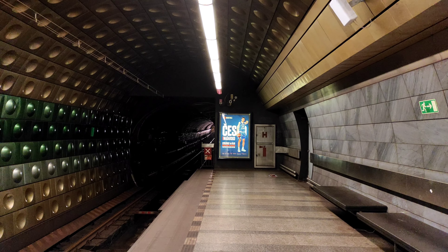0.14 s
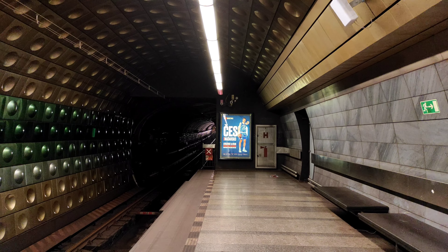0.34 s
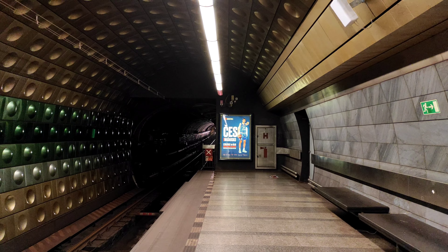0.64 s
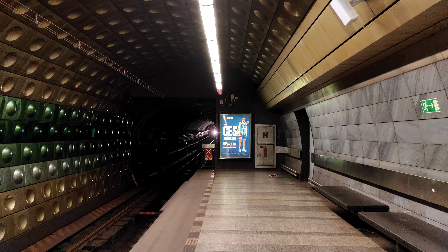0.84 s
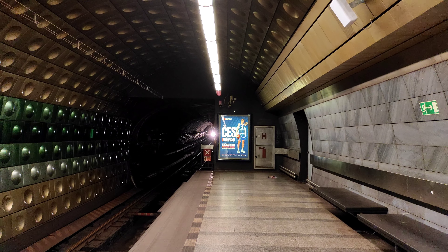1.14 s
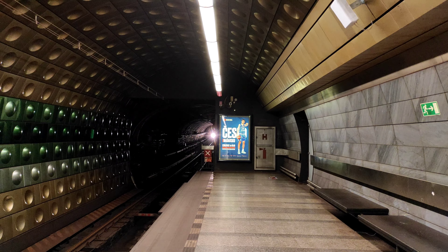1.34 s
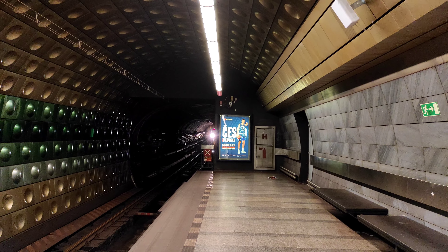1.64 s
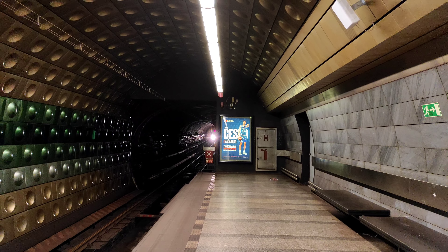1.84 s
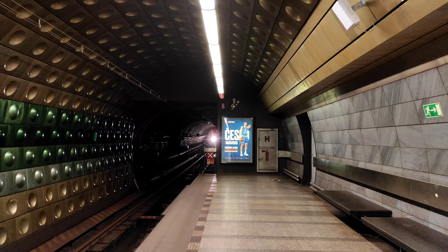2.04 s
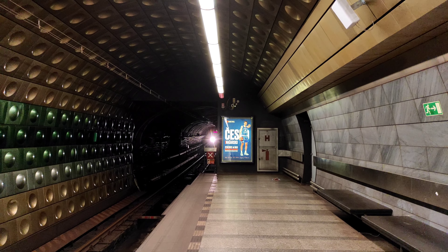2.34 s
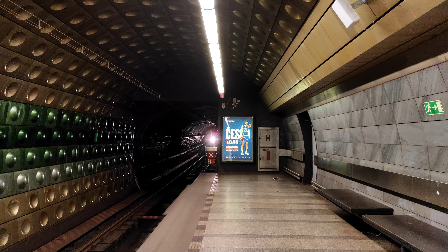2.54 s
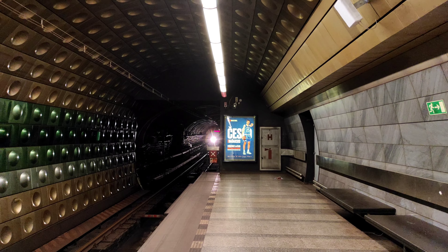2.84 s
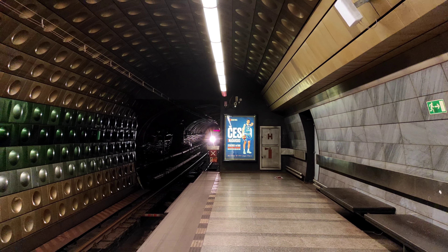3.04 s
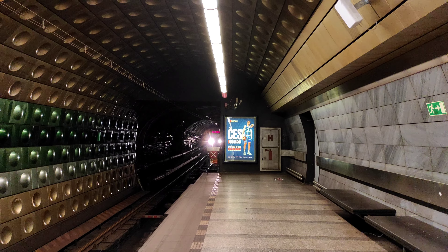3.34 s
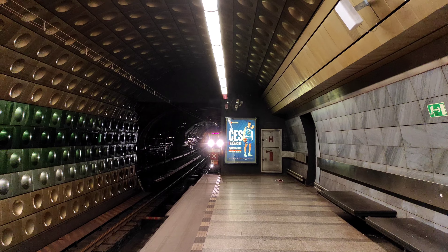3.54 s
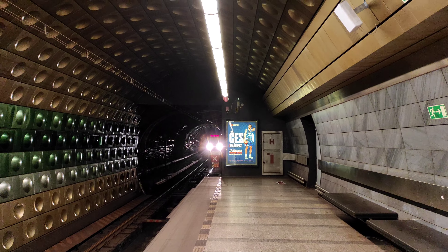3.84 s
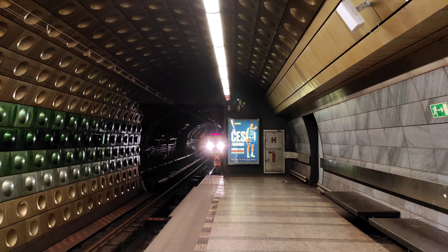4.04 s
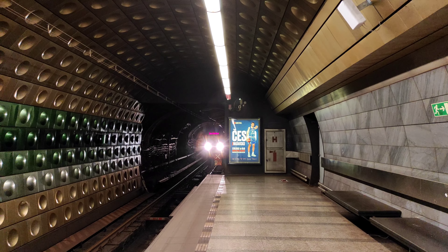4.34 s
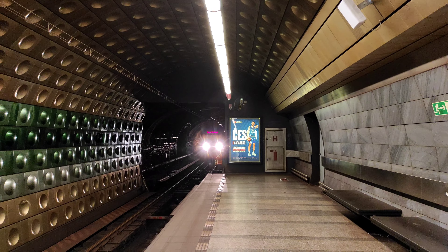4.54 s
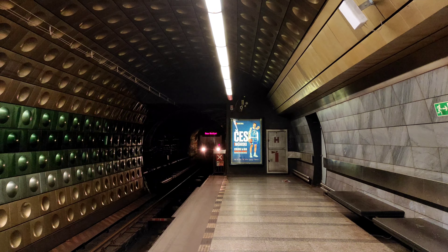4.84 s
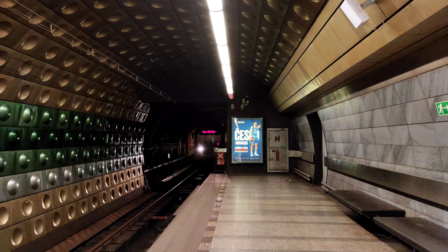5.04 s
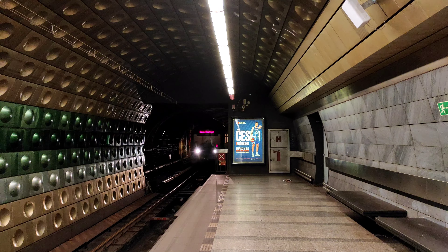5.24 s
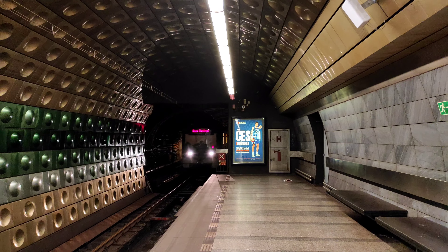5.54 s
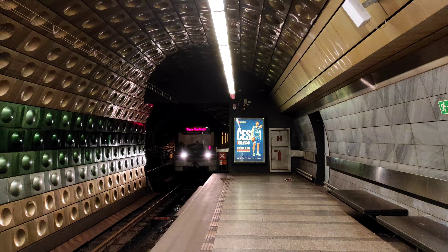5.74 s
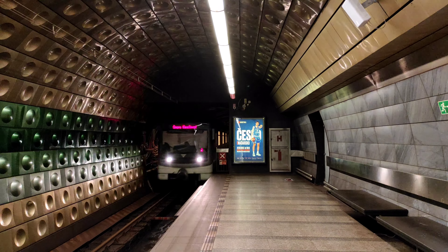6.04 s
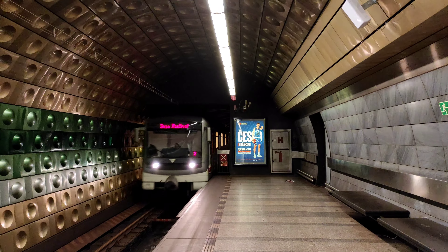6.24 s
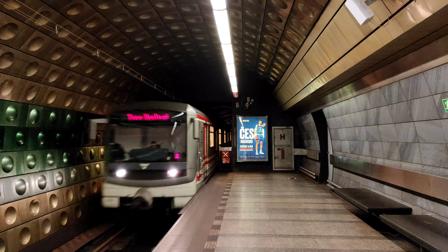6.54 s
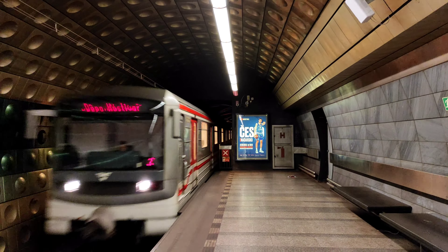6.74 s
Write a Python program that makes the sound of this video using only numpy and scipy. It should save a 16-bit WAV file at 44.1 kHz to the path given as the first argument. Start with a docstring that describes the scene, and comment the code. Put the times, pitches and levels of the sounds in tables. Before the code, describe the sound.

Stereo microphone on a vaulted metro platform, exposed to air pushed from the tunnel. First comes distant low rumble, mostly left, with fluttering wind thumps and one tiny dry tick at right. Rumble and falling electric whine grow, rails shimmer ahead of the train. In the last second or so, bright steel rolling, double bang of axles, short metallic screech, clear throbbing whine and gritty brake rub arrive close and loud.

```python
"""First a low tunnel roar and thumps of wind, then a metro train brakes into a vaulted station.
The roar is shaped noise that grows and brightens; motor and gear whines are wandering tones that sink.
Rolling, hiss and singing rails are bands of noise; a rail joint, scrapes and rubbing brakes join late.
Loudness follows the train's distance. The air it pushes ahead buffets two microphone ports:
noise in gusts, with short packets for single eddies."""
import sys
import numpy as np
from scipy import signal
from scipy.fft import rfft, irfft
from scipy.io import wavfile
from scipy.ndimage import uniform_filter1d, minimum_filter1d

SR = 44100
rng = np.random.default_rng(int(sys.argv[2]) if len(sys.argv) > 2 else 0)


def store_pcm(level_fs):
    """Save levels as 16-bit WAV."""
    pcm = np.round(np.clip(level_fs, -1, 1) * 32767).astype(np.int16)
    wavfile.write(sys.argv[1], SR, np.atleast_2d(pcm).T)


N = 303849

# time frames and frequency steps used to shape moving noise
SIZE, HOP = 1024, 256
HZ = np.fft.rfftfreq(SIZE, 1 / SR)
T = np.arange(N // HOP + 5)[:, None] * HOP / SR

# steady station air, colour: [f/Hz, relative level/dB per Hz]
AIR_COLOUR = [(3000, -36), (6400, -18), (7300, 12), (7850, 16.5), (8400, 8.5), (9000, -44), (10500, -49),
              (12600, -22.5), (15000, -35)]
AIR_DB = -47

# gusts pushed out of the tunnel: [t/s, length/s, left strength/dB, right strength/dB]
GUSTS = [(0.019, 0.12, -18, -25.5), (0.291, 0.12, -22, -15), (0.447, 0.033, -16.5, -24),
         (0.54, 0.058, -35, -29), (0.753, 0.028, -20, -38), (1.722, 0.028, -20, -14.5),
         (1.81, 0.085, -19.5, -26), (1.95, 0.18, -21, -20.5), (2.879, 0.14, -14.5, -16.5),
         (3.041, 0.057, -21, -21), (3.212, 0.052, -13.5, -21), (3.355, 0.081, -11, -13),
         (3.54, 0.2, -16, -18.5), (3.771, 0.025, -10.5, -14.5), (3.908, 0.058, -18.5, -17),
         (4.106, 0.025, -35, -20), (4.56, 0.13, -23.5, -22), (4.747, 0.049, -21, -11.5),
         (5.644, 0.019, -19, -15), (5.902, 0.053, -36, -15.5), (6.076, 0.035, -13, -16.5),
         (6.455, 0.073, -18, -28), (6.863, .05, -16, -17)]
GUST_RISE_S, GUST_SAG_DB_PER_S, GUST_FALL_DB_PER_S = 0.028, 15.5, 110
# draught between gusts (left, right): strength, change as the train nears; then the random swell
DRAUGHT_DB, DRAUGHT_GROWTH_DB, DRAUGHT_SWELL_DB = (-29, -36), (-4.5, 5.5), 4.5
# strongest single eddies on a port: [t/s, level/dB, corner f/Hz, port (0 left, 1 right)]
BUFFETS = [(.062, -8, 340, 0), (.111, -10.5, 270, 0), (.254, -15, 550, 0), (.275, -14, 600, 1),
           (.364, -15, 600, 1), (.408, -6.5, 493, 1), (1.721, -9.5, 300, 1), (1.751, -16, 900, 1),
           (1.766, -8.5, 624, 1), (1.794, -18, 650, 1), (1.855, -13, 240, 0), (1.946, -17, 240, 0),
           (2.008, -14, 260, 0), (2.198, -8.5, 270, 0), (2.885, -13, 420, 0), (3.342, -6, 400, 0),
           (3.367, -14, 1000, 1), (3.378, -9.5, 900, 1), (3.388, -12, 750, 1), (3.398, -6, 600, 1),
           (3.411, -24, 1200, 1), (3.421, -19, 950, 0), (3.449, -9, 850, 0), (3.536, -6, 790, 1),
           (3.541, -6.5, 650, 1), (3.545, -13, 850, 1), (3.601, -11, 320, 0), (3.758, -1, 450, 0),
           (3.809, -15, 380, 0), (3.938, -6.5, 340, 0), (4.132, -10, 484, 1), (4.777, -11, 450, 1),
           (4.799, -11, 650, 1), (4.803, -9, 650, 1), (4.941, -8, 330, 0), (5.66, -4, 544, 1)]
BUFFET_CYCLES = 2.56  # length in cycles of the corner: a small eddy is brighter and shorter
# ringing of the hollow behind a port: [f/Hz, width/Hz, gain/dB]
PORT_RING = (1060, 450, 2.8)

# one dry tick by the right port: [t/s, level/dB]
TICK = (.4065, -5.5)
# ringing of the tapped casing: [f/Hz, relative level/dB, time to fall 60 dB/s]
TICK_MODES = [(1420, 3, 0.0058), (2450, -6, 0.0068), (3540, -11, 0.006), (5570, -19, .006)]

# speed of the braking train, as the pitch of its motors: [t/s, whine f/Hz]
WHINE = [(0, 602), (1, 587), (2, 570), (3, 545), (4.1, 520), (5, 500), (5.75, 476), (6.3, 451), (6.89, 434)]
WHINE_HZ_PER_M_S = 40
DEEP_M = 65.5  # from this far off the train has only the dull colour of the tunnel
MOUTH_M, MOUTH_FADE_M = 12, 5.8  # tunnel mouth, and depth behind it over which top treble is lost
# growth of each sound as the train comes:
# [base level at the platform/dB, distance within which growth levels off/m, tunnel loss/dB per m]
ROAR_REACH = (-17, 106, 0.068)
ROLL_REACH = (-20.5, 11, 0.087)
HISS_REACH = (-27.5, 10.4, 0.14)
MOTOR_REACH = (-19.8, 12.6, .03)

# tunnel roar with the train far and near, colour: [f/Hz, relative level/dB per Hz]
ROAR_FAR = [(20, -14.5), (120, -13.5), (170, -11.5), (205, 1.5), (280, 1), (430, -10.5), (620, -10),
            (800, -13), (1050, -15), (1500, -28.5), (2500, -39.5), (6000, -68), (12000, -93)]
ROAR_NEAR = [(20, -2), (120, -5.5), (170, -24), (210, 1.5), (310, 5.5), (480, 3), (640, -9), (800, -2.5),
             (1030, 0.5), (1300, -15.5), (1700, -16), (3000, -33.5), (12000, -91)]
# low drone of the tunnel: [f/Hz, width/Hz, left level/dB]
DRONE = (166, 19, -28.5)

# bands in which the rails sing: [f/Hz, width/Hz, relative level/dB]
RAIL_MODES = [(4930, 440, -1), (7330, 340, -3.5), (9490, 540, -15.5), (12100, 550, -34.5)]
# the singing is faint until its start, rises quickly, holds, and fades slowly
SING_START_S, SING_RISE_S, SING_HOLD_S, SING_DB, SING_FADE_DB_PER_S = 3.41, 0.13, 1.34, -38, 10

# a second whine, from the gears, that the tunnel carries far
GEAR_MULTIPLE, GEAR_WIDTH_HZ = 1.143, 44
# its loudness: [t/s, left level/dB]
GEAR_LEVEL = [(0, -34), (1.9, -31), (2.8, -30), (4.4, -30.5), (5.5, -31.5), (6.2, -38)]
# tones of the motors: [multiple of the whine, relative level/dB, right port against left/dB]
MOTOR_ORDERS = [(1, 3, -4.5), (2.03, -6.5, -9.5), (4.03, -7, -11.5)]
# the whine throbs, as motors at slightly different speeds do: time between swells, moment of one
THROB_S, THROB_AT_S = 0.179, 6.325
CLEAR_SHARE = .72  # share of the whine's power that comes straight, not as echoes, when nearest

# wheels rolling on steel, colour: [f/Hz, relative level/dB per Hz]
ROLLING = [(300, -10.5), (1200, -0.5), (1680, -5.5), (2050, 2.5), (2400, 2), (2800, -3.5), (3500, -9.5),
           (4200, -12.5), (5500, -15), (8500, -45.5), (10500, -82.5), (15000, -50.5)]
# hiss that runs ahead in the rails, colour: [f/Hz, relative level/dB per Hz]
HISS = [(3000, -24.5), (5500, -11), (6400, -3.5), (6950, 3.5), (7450, 3), (8100, 1), (9000, -6.5),
        (10300, -27), (12200, -17), (15000, -34)]
# wheel ringing: [f/Hz, width/Hz, relative level/dB]
WHEEL_MODES = [(1410, 25, -17), (1820, 14, -11), (1900, 18, -13.5), (2140, 35, -6.5), (2472, 29, 1),
               (2820, 25, -19.5), (3200, 30, -22), (5750, 25, -16)]

# axles dropping over a rail joint: [t/s, boom level/dB, boom time to fall 60 dB/s, ring level/dB]
AXLES = [(5.8, -11.5, 1.3, -13), (5.948, -13.5, 1.3, -17.5), (6.785, -16.5, 0.95, -22)]
# boom of the bogie (wheel frame), colour: [f/Hz, relative level/dB per Hz]
BOGIE_BOOM = [(60, -24), (200, -17), (300, -1), (400, 3.5), (620, -7), (800, -3), (1000, -3), (1200, -12.5),
              (1600, -23), (3000, -48), (12000, -69)]
# ringing of the struck bogie: [f/Hz, relative level/dB, time to fall 60 dB/s]
BOGIE_MODES = [(250.3, 3, 0.27), (321, -1, 0.45), (397, -4, 0.56), (820, -3.5, 0.39), (958, -1, 0.33),
               (990, 2, 0.21)]
RING_RISE_CYCLES = 4.5  # counted in cycles, so the low modes take longer to build up

# wheel flanges (rims) scraping the rail: [t/s, level/dB, centre f/Hz, width/octaves, length/s]
SCRAPES = [(2.692, -43, 7370, 0.024, 0.064), (4.573, -35.5, 6300, 0.32, 0.16),
           (4.762, -34, 7300, 0.057, 0.15), (5.786, -31, 7150, 0.096, 0.042),
           (5.94, -37, 8300, 0.12, 0.032), (6.237, -33, 5650, 0.017, 0.1), (6.25, -39, 4570, 0.04, .08),
           (6.799, -22, 3000, 0.41, 0.064), (6.8, -29, 5030, 0.35, 0.064)]
# one hard screech of a flange: [t/s, level/dB, length/s]
SCREECH = (6.178, -23.5, 0.044)
# bands that it rings: [centre f/Hz, width/octaves, relative level/dB]
SCREECH_BANDS = [(2700, 0.44, -2), (4550, .13, -3), (5900, 0.058, -0.5), (6650, 0.04, -2.5),
                 (7300, 0.085, -2), (8800, 0.13, -15.5)]
SCRAPE_TOP_HZ = 9000  # scrapes and screech fall off steeply above this

# brakes bite and keep rubbing: [start t/s, rise/s, base level/dB, swell/dB per s]
BRAKE = (6.5, 0.6, -23, 1.5)
# their rubbing, colour: [f/Hz, relative level/dB per Hz]
BRAKE_RUB = [(1500, -21.5), (2000, 5), (2450, 4), (3000, -8), (4200, -14), (5700, -10), (6300, -6),
             (7400, -1), (8500, -2.5), (9400, -14), (10500, -38), (15000, -52.5)]
# squeals in it: [f/Hz, width/Hz, relative level/dB]
BRAKE_MODES = [(4850, 25, -15.5), (6100, 25, -13.5), (6470, 20, -13), (6700, 22, -12.5), (7160, 25, -13),
               (7570, 25, -5.5)]

EDGE_HZ = 15300  # top of the final sound


def gain_of(db):
    """Turns decibels into amplitude."""
    return 10 ** (np.asarray(db) / 20)


def evened(x, axis=None):
    """Scales to an rms (average strength) of 1."""
    return x / np.sqrt(np.mean(abs(x) ** 2, axis, keepdims=True) + 1e-20)


def read(points, hz=HZ):
    """Reads a spectrum, joining its points straight on a log-frequency axis."""
    f, value = np.transpose(points)
    return np.interp(np.log(hz + 1), np.log(f + 1), value)


def curves(rows):
    """Reads each column of a table at the frame times."""
    s, *columns = np.transpose(rows)
    return [np.interp(T, s, c) for c in columns]


def per_sample(value):
    """Joins frame values up to the sample rate."""
    return np.interp(np.arange(N) / SR, T[:, 0], np.ravel(value + 0 * T))


def peak(hz, width_hz):
    """A bell-shaped band."""
    return np.exp(-1.4 * ((HZ - hz) / width_hz) ** 2)


def lumps(count, size):
    """Smooth chance, rms 1, in lumps of about size points."""
    smooth = uniform_filter1d(rng.standard_normal(count), size)
    return evened(uniform_filter1d(smooth, size * 2 // 3))


def patches(size=(8, 10)):
    """Smooth chance over time and frequency, rms 1."""
    field = rng.standard_normal((len(T), len(HZ)))
    return evened(uniform_filter1d(uniform_filter1d(field, size[0], 0), size[1], 1))


def add(mix, s, sound):
    """Adds a stereo sound at time s."""
    part = mix[:, round(s * SR):][:, :sound.shape[1]]
    part += sound[:, :part.shape[1]]


def noise(shape, level_db, right_db=0., likeness=0., left_lag_s=0.):
    """Stereo noise with a moving spectrum; level_db is the rms level on the left."""
    a, b, c, d = rng.standard_normal((4, len(T), len(HZ)))
    same, left = np.clip(likeness, -1, 1), a + 1j * b
    right = same * left + np.sqrt(1 - same ** 2) * (c + 1j * d)
    right = right * gain_of(right_db) * np.exp(2j * np.pi * HZ * left_lag_s)
    z = np.array([left, right]) * evened(shape, axis=-1) * gain_of(level_db)
    z = z.swapaxes(1, 2) * np.sqrt(3 / SIZE)
    return signal.istft(z, nperseg=SIZE, noverlap=SIZE - HOP)[1][:, :N]


def smeared_tone(hz, width_hz, level_db, right_db, likeness, direct=0):
    """A tone by many paths: apart from its direct share, height and phase wander at each port."""
    offset_hz = np.fft.fftfreq(len(T), HOP / SR)
    a, b = rng.standard_normal((2, 2, len(T)))
    spread = (a + 1j * b) / (1 + (1.58 * offset_hz / width_hz) ** 2)
    left, other = evened(np.fft.ifft(spread), axis=-1)
    same, direct = np.clip(likeness, -1, 1), np.clip(np.ravel(direct), 0, 1)
    echoes = np.array([left, same * left + np.sqrt(1 - same ** 2) * other])
    ports = np.sqrt(direct) + np.sqrt(1 - direct) * echoes
    turn = np.sqrt(2) * np.exp(2j * np.pi * np.cumsum(per_sample(hz)) / SR)
    return np.array([(turn * per_sample(port[:, None] * gain_of(level_db + db))).real
                     for port, db in zip(ports, (0, right_db))])


def distance_m():
    """The way the train still has to roll to the microphone; its speed goes with the whine."""
    speed = curves(WHINE)[0] / WHINE_HZ_PER_M_S
    return np.cumsum(speed[::-1], axis=0)[::-1] * HOP / SR


def nearness():
    """0 deep in the tunnel, 1 at the platform."""
    return np.clip(1 - distance_m() / DEEP_M, 0, 1)


def approach(platform_db, reach_m, loss_db_per_m):
    """Level in dB of a sound on the train: it spreads with distance and the tunnel absorbs it."""
    way = distance_m()
    return platform_db - 10 * np.log10(1 + (way / reach_m) ** 2) - loss_db_per_m * way


def shifting_modes(x, depth_db, full_hz=5000, size=2048):
    """Close by, echoes no longer smooth the sound: narrow peaks and valleys come and go."""
    hz, t, z = signal.stft(x, SR, nperseg=size, noverlap=size * 3 // 4)
    field = uniform_filter1d(rng.standard_normal(z.shape[1:]), size=2, axis=0)
    field = evened(uniform_filter1d(field, size=10, axis=1))
    near = np.interp(t, T[:, 0], nearness()[:, 0])
    depth = depth_db * near ** 2 * np.minimum(hz / full_hz, 1)[:, None]
    gain = gain_of(depth * np.minimum(field, 1.5))
    gain /= np.sqrt(uniform_filter1d(gain ** 2, size=40, axis=0))  # keeps the broad colour
    return signal.istft(z * gain, nperseg=size, noverlap=size * 3 // 4)[1][:, :N]


def station_air():
    """A thin steady hiss, mostly on the left."""
    return noise(gain_of(read(AIR_COLOUR)), AIR_DB + 2.14 * patches(size=(10, 20)), -6.0, 0.74)


def tick(left_db=-22):
    """A small tap rings the casing next to the right port."""
    s, db = TICK
    t = np.maximum(np.arange(N) / SR - s, 0)
    ring = sum(gain_of(db + mode_db - 60 * t / t60) * np.sin(2 * np.pi * hz * t)
               for hz, mode_db, t60 in TICK_MODES)
    return gain_of([[left_db], [0]]) * ring * (1 - np.exp(-t / 0.00036))


def eddy_colour(hz, corner_hz, steepness=2.74):
    """Turbulence on a port: flat to a corner, then falling; the microphone thins its deep bass."""
    bass_points = [(8, -22.0), (25, 4.0), (50, -1.0), (80, 0.5), (120, -7.0), (160, 1.5), (300, 1.5)]
    return gain_of(read(bass_points, hz)) / np.sqrt(1 + (hz / corner_hz) ** (2 * steepness))


def wind_strength(port):
    """Strength in dB at one port: a wandering draught, and gusts that rise fast, sag and die away."""
    swell = uniform_filter1d(rng.standard_normal(T.shape), size=24, axis=0)
    swell = evened(uniform_filter1d(swell, size=16, axis=0))
    draught_db = DRAUGHT_DB[port] + DRAUGHT_GROWTH_DB[port] * nearness() + DRAUGHT_SWELL_DB * swell
    power = gain_of(draught_db) ** 2
    for s, length, *port_db in GUSTS:
        age = T - s
        sag_db = GUST_SAG_DB_PER_S * np.maximum(age, 0)
        fall_db = GUST_FALL_DB_PER_S * np.maximum(age - length, 0)
        rise = np.clip(1 + age / GUST_RISE_S, 0, 1)
        power = power + (rise * gain_of(port_db[port] - (sag_db + fall_db))) ** 2
    return 10 * np.log10(power)


def small_eddies(level_db, corner_hz, per_s=40, relative_db=-8.5, spread_db=7, steepness=3.36):
    """Small eddies patter on a port at random, as hard as the wind blows."""
    hits = rng.random(N) < per_s / SR
    kicks = hits * rng.choice([-1, 1], N) * gain_of(spread_db * rng.random(N))
    colour = eddy_colour(np.fft.rfftfreq(N, 1 / SR), corner_hz, steepness)
    patter = irfft(rfft(kicks) * colour, N)
    return evened(patter) * per_sample(gain_of(level_db + relative_db))


def wind(corner_hz=260, lumpy_db=2.0, patter_hz=(380, 600)):
    """Each port has its own turbulence; a stronger gust makes smaller eddies and sounds brighter."""
    ports = []
    for port in range(2):
        level_db = wind_strength(port)
        colour = eddy_colour(HZ, corner_hz * 2 ** ((level_db + 17.5) / 18))
        flow = noise(colour, level_db - 0.8)[0] * gain_of(lumpy_db * lumps(count=N, size=600))
        ports.append(flow + small_eddies(level_db, patter_hz[port]))
    return np.array(ports)


def burst(s, db, length, colour, slap=1.1, size=4096):
    """Short turbulence with a sharp slap at its centre, at time s, with rms db over its length."""
    t = (np.arange(size) - size // 2) / SR
    kicks = rng.standard_normal(size) * np.exp(-(1.42 * t / length) ** 2)
    kicks[size // 2] += rng.choice([-1, 1]) * slap * np.sqrt(length * SR)
    packet = irfft(rfft(kicks) * colour(np.fft.rfftfreq(size, 1 / SR)))
    packet *= gain_of(db) * np.sqrt(length * SR) / np.linalg.norm(packet)
    return np.interp(np.arange(N) / SR, s + t, packet, 0, 0)


def buffets(steepness=2.97):
    """Single eddies thump one port or the other; the small hard ones also ring it with a clack."""
    out, (ring_hz, ring_width, ring_db) = np.zeros((2, N)), PORT_RING
    ring = lambda hz: gain_of(ring_db / (1 + ((hz - ring_hz) / ring_width) ** 2))
    for s, db, corner_hz, port in BUFFETS:
        colour = lambda hz: eddy_colour(hz, corner_hz, steepness) * ring(hz)
        out[int(port > .5)] += burst(s, db, BUFFET_CYCLES / corner_hz, colour)
    return out


def roar():
    """The tunnel pipes the rumble ahead and drones; the upper part opens as the train nears the mouth."""
    near = nearness()
    colour_db = (1 - near) * read(ROAR_FAR) + near * read(ROAR_NEAR)
    right_points = [(60, -6), (170, -8.0), (400, -11.0), (650, -3.5), (1000, -11.0), (1500, -3)]
    right_db = read(right_points) + 2.1 * near
    likeness = read([(60, 0.36), (150, 0.63), (300, 0.9), (640, 0.63), (1400, 0.2)])
    level_db = approach(*ROAR_REACH) + 1.0 * patches(size=(10, 12))
    rumble = noise(gain_of(colour_db), level_db, right_db, likeness, 0.00017)
    return rumble + smeared_tone(*DRONE, -7.0, 1.0)


def rails():
    """The rails sing in a few wide bands ahead of the train."""
    bands = sum(gain_of(db) * peak(hz, width) for hz, width, db in RAIL_MODES)
    shimmer_db = 0.9 * patches(size=(8, 10)) + 1.3 * patches(size=(16, 2))
    age = T - SING_START_S
    rise_db = 20 * np.log10(np.clip(age / SING_RISE_S, .02, 1))
    fade_db = SING_FADE_DB_PER_S * np.maximum(age - SING_HOLD_S, 0)
    return noise(bands, SING_DB + rise_db - fade_db + shimmer_db, -1.2, 0.24)


def gears():
    """A whine above the motors' own comes only as echoes, and sinks with the same speed."""
    gear_hz = GEAR_MULTIPLE * curves(WHINE)[0]
    return smeared_tone(gear_hz, GEAR_WIDTH_HZ, curves(GEAR_LEVEL)[0], -7.5, 0.42)


def motors(far_width_hz=50, throb_db=5.5):
    """The whine sinks as the train brakes; echoes smear it, and it clears and throbs on coming out."""
    hz, near = curves(WHINE)[0], nearness()
    throb = np.cos(2 * np.pi * (T - THROB_AT_S) / THROB_S)
    level_db = approach(*MOTOR_REACH) + throb_db * near ** 2 * throb
    direct = CLEAR_SHARE * near ** 2
    out = 0
    for k, db, right_db in MOTOR_ORDERS:
        tone_db = level_db + db - 3 * (k - 1) * (1 - near)  # far off, the higher tones are weaker
        out = out + smeared_tone(k * hz, far_width_hz * np.sqrt(k), tone_db, right_db, 0.21 / k, direct / k)
    return out


def wheels(ringing_db=-14, absorbed_db=12, ring_loss_db_per_khz=5, grit_db=1.1, ragged_db=7):
    """Rough steel rolls on steel: gritty noise, ringing wheel discs, and a spitting hiss."""
    near, rolling_db = nearness(), approach(*ROLL_REACH)
    # distance takes the top treble
    depth = np.clip((distance_m() - MOUTH_M) / MOUTH_FADE_M, 0, 1)
    tunnel_db = -absorbed_db * depth * np.clip((HZ - 8500) / 2000, 0, 1)
    # countless high modes of wheel and rail come and go
    fine_db = 2.2 * patches(size=(16, 2)) * np.clip(HZ / 4000, 0, 1)
    rolling_colour = gain_of(read(ROLLING) + tunnel_db + fine_db)
    rolling = noise(rolling_colour, rolling_db + 1.43 * patches(size=(9, 16)), -4.0, 0.055)
    ringing = 0
    for hz, width, db in WHEEL_MODES:
        far_loss_db = ring_loss_db_per_khz * hz / 1000 * (1 - near)
        mode_db = rolling_db + ringing_db + db - far_loss_db
        ringing = ringing + smeared_tone(hz, width, mode_db, 0.77, 0.27)
    right_db = read([(6000, 5.5), (7500, 0.0), (8600, -8.5), (11000, -5.5)])
    spitting_db = 2.3 * patches(size=(5, 16))
    hiss_colour = gain_of(read(HISS) + tunnel_db + fine_db)
    hiss = noise(hiss_colour, approach(*HISS_REACH) + spitting_db, right_db, 0.48)
    grit = gain_of(grit_db * per_sample(near ** 4) * lumps(count=N, size=220))
    return shifting_modes(rolling + hiss, ragged_db) * grit + ringing


def joint(rise_s=0.014, rattle_db=-1.2, ring_right_db=-1, size=32768):
    """Each axle bangs and rings the bogie, and the vault holds the boom."""
    power = 0
    for s, db, t60, _ in AXLES:
        rise = np.clip((T - s) / rise_s + 1, 0, 1)
        power = power + gain_of(db - 60 * np.maximum(T - s, 0) / t60) ** 2 * rise
    level_db = 10 * np.log10(power + 1e-12) + 2.1 * patches(size=(4, 12))
    boom = noise(gain_of(read(BOGIE_BOOM)), level_db, -.3, 0.49)
    out, t = boom * gain_of(rattle_db * lumps(count=N, size=300)), np.arange(size) / SR
    for s, _, _, ring_db in AXLES:
        for hz, db, t60 in BOGIE_MODES:
            phase = rng.random() + rng.random((2, 1)) / 4
            envelope = (1 - np.exp(-t * hz / RING_RISE_CYCLES)) * gain_of(ring_db + db - 60 * t / t60)
            add(out, s, gain_of([[0], [ring_right_db]]) * envelope * np.sin(2 * np.pi * (hz * t + phase)))
    return out


def flanges(rise_share=0.18, release_db_per_s=420, echo_db=-15, echo_t60=0.55, modes_db=4,
            grit_db=2.0, shared=0.92, size=32768):
    """Gritty scrapes of steel bite quickly, pick out single modes, and leave a tail in the vault."""
    out, t, f = np.zeros((2, N)), np.arange(size) / SR, np.fft.rfftfreq(size, 1 / SR)
    screech_s, screech_db, screech_length = SCREECH
    screech = [(screech_s, screech_db + db, hz, octaves, screech_length)
               for hz, octaves, db in SCREECH_BANDS]
    for s, db, hz, octaves, length in SCRAPES + screech:
        band = np.exp(-.5 * (np.log2((f + 1) / hz) / octaves) ** 2)
        band = band * gain_of(modes_db * lumps(count=len(f), size=50))
        band = band / np.sqrt(1 + (f / SCRAPE_TOP_HZ) ** 20)
        # the two ports share part of the slipping
        slip = rng.standard_normal((2, size)) + shared * rng.standard_normal(size)
        grit = gain_of(grit_db * lumps(count=size, size=150))
        scrape = evened(irfft(rfft(slip * grit) * band))
        after = np.maximum(t - length, 0)
        fade_db = np.maximum(-release_db_per_s * after, echo_db - 60 * after / echo_t60)
        add(out, s, scrape * np.minimum(t / (rise_share * length), 1) * gain_of(db + fade_db))
    return out


def brakes(grit_db=0.6, ragged_db=7):
    """Pads grind on steel: a swelling, gritty scrape with thin squeals in it."""
    start, rise, db, swell = BRAKE
    bite_db = 20 * np.log10(np.clip((T - start) / rise, 1e-4, 1))
    level_db = db + swell * (T - start) + bite_db
    rub = noise(gain_of(read(BRAKE_RUB)), level_db + 1.8 * patches(size=(6, 14)), -3.1, 0.3)
    squeals = sum(smeared_tone(hz, width, level_db + mode_db, -1.5, 0.61)
                  for hz, width, mode_db in BRAKE_MODES)
    grit = evened(gain_of(grit_db * lumps(count=N, size=120)))
    return (shifting_modes(rub, ragged_db) + squeals) * grit


def scene():
    """The station air, the wind that the train drives, and the train itself."""
    background = station_air() + tick() + wind() + buffets()
    train = roar() + rails() + gears() + motors() + wheels() + joint() + flanges() + brakes()
    return background + train


def record(dry):
    """A fast limiter holds peaks under full scale; then the treble is cut off at the band limit."""
    room = np.minimum(1, .97 / (abs(dry) + 1e-9))
    gain = uniform_filter1d(minimum_filter1d(room, size=301, axis=1), size=301, axis=1)
    low_pass = signal.firwin(511, EDGE_HZ, window=("kaiser", 9), fs=SR)
    return signal.oaconvolve(dry * gain, low_pass[None], "same")


dry = scene()
out = record(dry)
store_pcm(out)
```